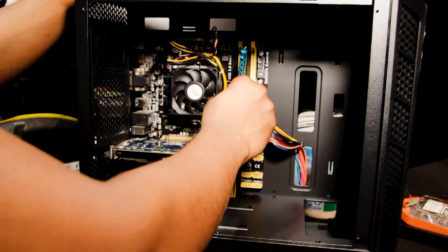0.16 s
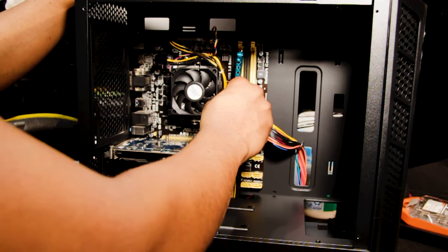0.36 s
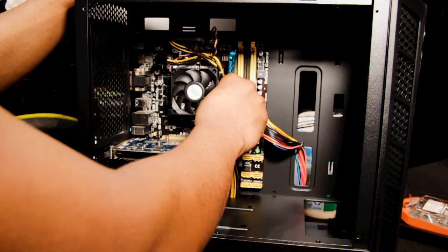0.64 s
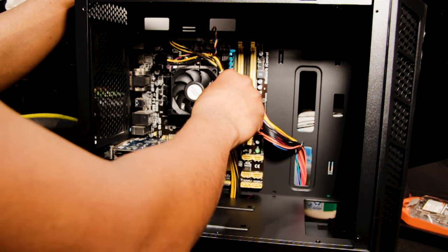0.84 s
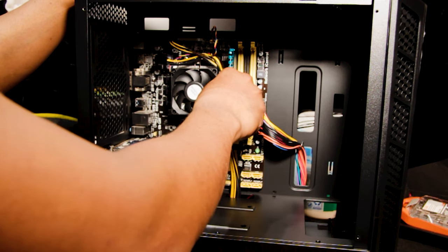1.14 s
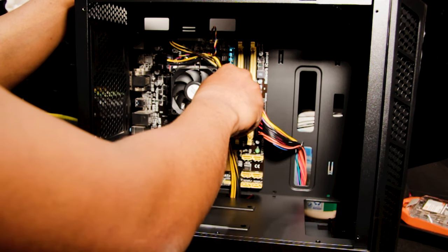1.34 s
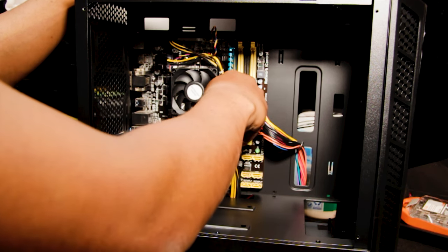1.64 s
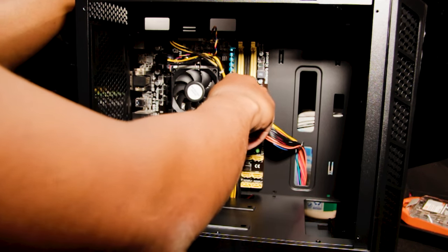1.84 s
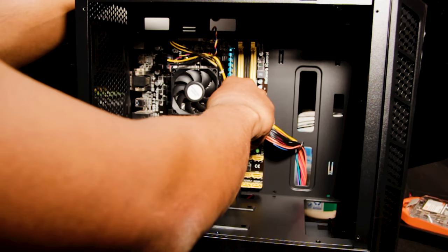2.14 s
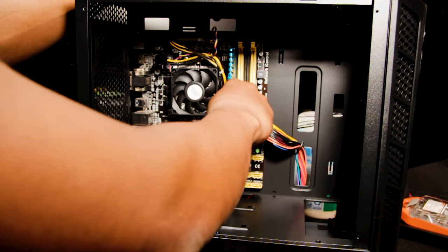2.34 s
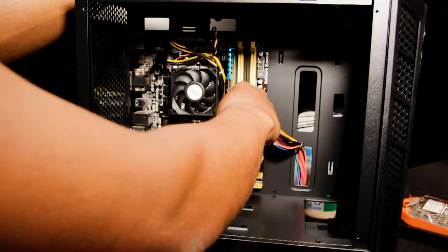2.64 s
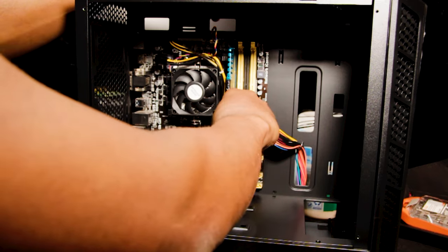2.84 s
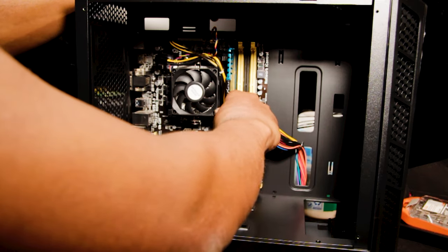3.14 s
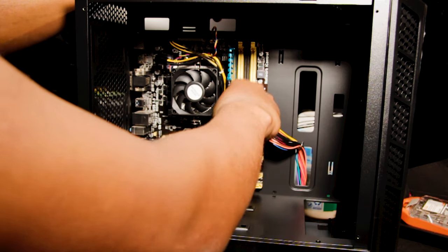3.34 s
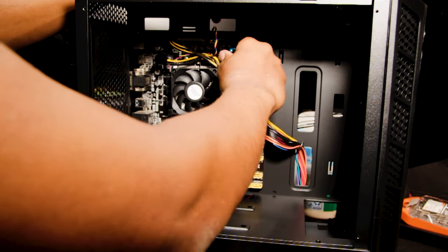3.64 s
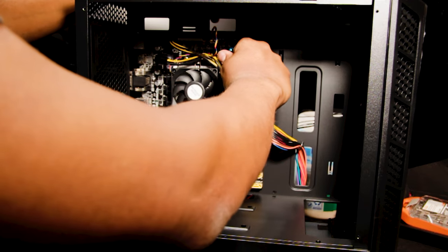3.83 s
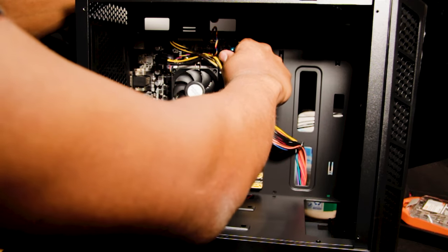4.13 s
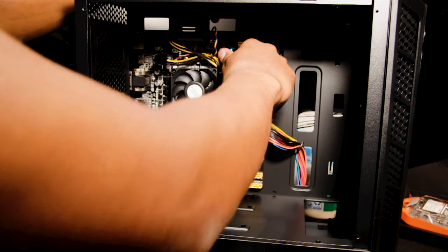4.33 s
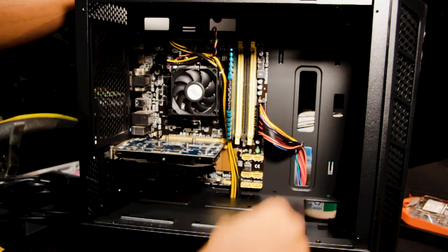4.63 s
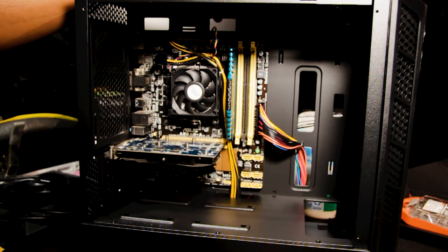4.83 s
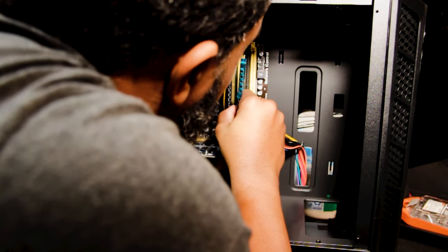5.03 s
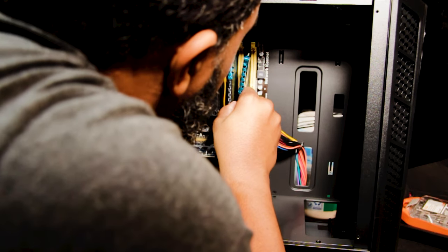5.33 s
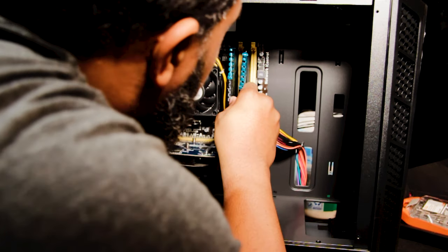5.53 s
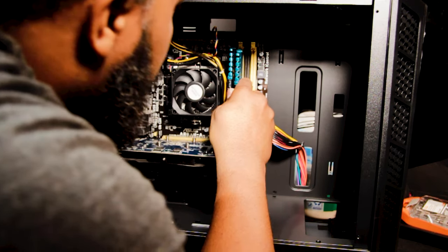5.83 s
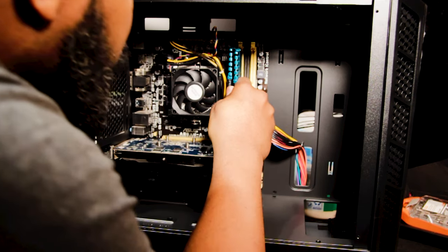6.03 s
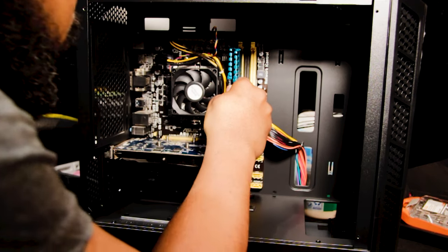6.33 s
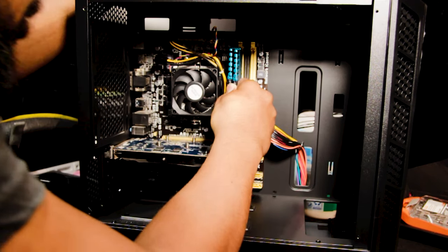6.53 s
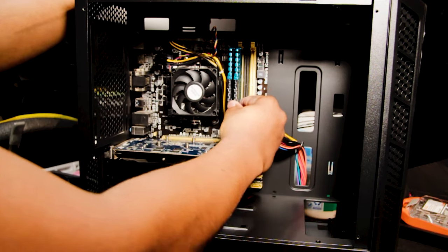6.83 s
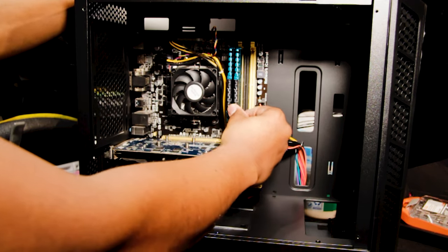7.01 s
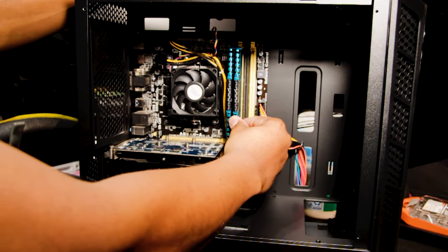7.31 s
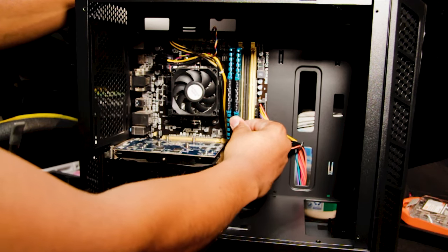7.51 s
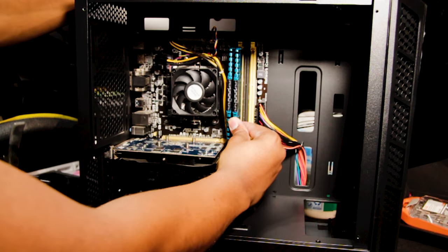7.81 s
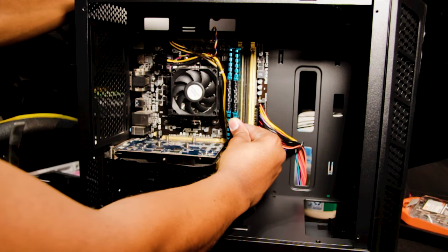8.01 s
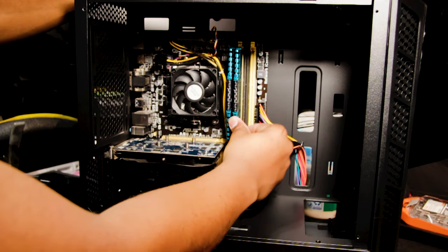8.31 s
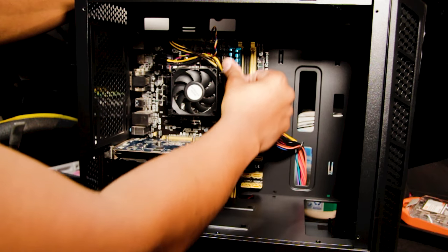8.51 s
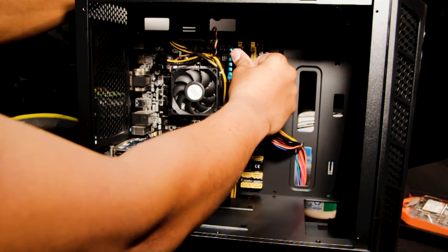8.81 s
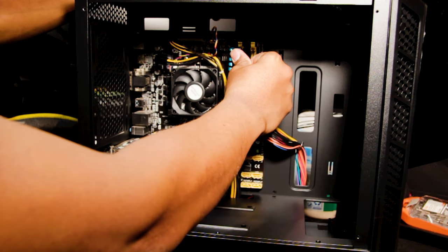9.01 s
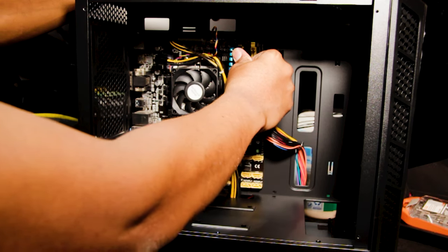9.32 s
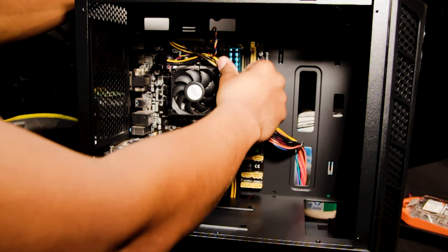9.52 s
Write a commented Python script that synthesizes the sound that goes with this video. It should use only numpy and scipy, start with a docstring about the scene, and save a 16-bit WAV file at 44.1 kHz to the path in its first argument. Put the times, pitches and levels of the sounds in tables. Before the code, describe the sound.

Memory modules are fitted into a motherboard in an open steel computer case, heard close in a quiet room over faint ventilation, hum and hiss. From about 0.4 to 3 seconds, light plastic knocks, ticks and small scrapes sound as the first module is nudged into its slot, with a tiny high squeak near 1.7 seconds. A latch snaps sharply at 3.1 seconds and another at 4.1, each with a brief ring from the board and case. Between 5 and 7.5 seconds come soft, dull finger presses, ticks, faint rubs and slight squeaks, with a bright little spring ping at 5.8. Two more sharp snaps lock the second module at 8.1 and 9.2 seconds. The four snaps are the loudest sounds. A very faint distant whine enters around 8.5 seconds, and a few tiny ticks close things near 9.5.

```python
"""Fitting two memory modules

In an open steel computer case in a quiet room, each module is nudged and scraped into its slot,
then pressed home end by end: the plastic latch snaps and rebounds, the motherboard rings, and case
and room carry the sound on. Knocks, presses, scrapes and rubs are clusters of tiny slips that drive
the same board. Springs ping, the guides squeak; ventilation, hum and microphone hiss lie underneath."""
import sys
import numpy as np
from scipy import signal
from scipy.fft import rfft, irfft
from scipy.io import wavfile
from scipy.ndimage import uniform_filter1d

SR = 44100
rng = np.random.default_rng(int(sys.argv[2]) if len(sys.argv) > 2 else 0)


def master_out(mix):
    """Clip the mix to full scale and print it as 16-bit PCM to the path in sys.argv[1]."""
    frames = np.transpose(np.atleast_2d(mix))
    ceiling = np.clip(frames, -1, 1)
    pcm = np.round(ceiling * 32767).astype(np.int16)
    wavfile.write(sys.argv[1], SR, pcm)


N = 426006
HIT_SIZE = 32768
HEAD_S = .05  # opening part of a hit, over which its level is set
T = np.arange(HIT_SIZE) / SR
F = np.arange(HIT_SIZE // 2 + 1) * SR / HIT_SIZE

# bands of a snap's colour: (edge [Hz])
SNAP_EDGES_HZ = [80, 200, 400, 700, 1100, 1700, 3000, 5500, 7500, 11500, 15500]
# bands of a touch's colour: (edge [Hz])
TOUCH_EDGES_HZ = [80, 200, 350, 600, 1100, 2600, 6000, 15500]


def snaps(slip_db=-11, slip_hz=1500, contact_db=-5, contact_t60_s=0.0092, rebound_db=-3):
    """The module slips into its contacts, the latch hits and rebounds, and the case gives."""
    # latch closures: (time [s], slip before [s], rebound after [s], latch and seat pitch [Hz],
    # level [dB], extra weight on the board [dB], ring passed to the case [dB])
    closures = [(3.1238, .0025, .0021, 920, -35.5, -2, -1.5), (4.081, .0016, .0025, 1300, -39.4, 5, -1),
                (8.079, .001, .002, 800, -37.5, 1, 0), (9.1578, .003, .0014, 3770, -39.5, -4.5, 0)]
    out = np.zeros(N)
    contact = fade(contact_t60_s) * (1 - np.exp(-T / 0.00021))  # plastic yields before it cracks
    slip_lowpass = signal.butter(2, slip_hz, fs=SR, output="sos")
    for s, slip_s, rebound_s, hz, db, weight_db, case_db in closures:
        hit, rebound, slip = rng.standard_normal((3, HIT_SIZE))
        sound = board(s, crack_db=-14, wash_db=case_db - 17.5, modes_db=case_db - 25.5, crack_t60_s=0.06)
        sound += undb(contact_db) * hit * contact
        add(sound, rebound_s, undb(contact_db + rebound_db) * rebound * contact)
        lead = max(int(slip_s * SR), 8)
        slip = undb(slip_db) * signal.sosfilt(slip_lowpass, slip[:lead]) * np.linspace(.2, 1, lead)
        sound = radiate(np.r_[slip, sound], hz, boost_db=7, q=3.3, top_hz=22000, low_hz=190)
        add(out, s - lead / SR, colour(sound, SNAP_EDGES_HZ, db + latch_colour(s, hz, weight_db)))
        add(out, s, thump(-66 + 4 * hand_place(s)))  # more give at the upper end
    return out


def latch_colour(s, hz, weight_db, weight_hz=1300, ring_db=2.0, ring_octaves=0.48):
    """Band dB of the latch under the hand: its seat rings; a heavier push brings out the board's lows."""
    # latch at each end of a slot: (level per snap band [dB])
    lower_db = [-32.5, -13.5, -9, -4, -7, 0, -6.5, -11.5, -5, -9]
    upper_db = [-26.5, -11.5, -9, -10, -5, -4.5, -0.9, -7, -4.5, -9.5]
    place = hand_place(s)
    latch_db = (1 - place) * np.array(lower_db) + place * np.array(upper_db)
    lows = 1 / (1 + (band_centres(SNAP_EDGES_HZ) / weight_hz) ** 2)
    return latch_db + weight_db * lows + ring_db * ring_share(SNAP_EDGES_HZ, hz, ring_octaves)


def knocks(ring_octaves=0.79):
    """The module meets the slot with a clack, gathered round the pitch of the struck part."""
    # knocks on the slot: (time [s], contact [s], pitch [Hz], level [dB], tilt [dB/octave], ring [dB])
    contacts = [(0.383, 0.0014, 900, -63.5, -4.5, -0.5), (.676, .0009, 825, -55.5, -1.2, -2.5),
                (0.824, 0.0076, 820, -64, 0, 11), (0.8337, .0018, 854, -53, 0.2, 11),
                (0.98, 0.0018, 714, -55.5, -3, 3.5), (1.19, 0.0059, 2040, -57.5, 0.5, 4.5),
                (1.233, 0.021, 3340, -56.5, 1.3, -0.5), (1.713, 0.0057, 420, -64.5, -1.5, 3.5),
                (2.469, 0.0022, 450, -65, -3, 2), (2.7081, 0.0059, 1110, -61, 1.5, 6.5),
                (2.973, 0.029, 750, -69.5, 1, 0), (3.873, 0.018, 1950, -58, 1.3, 2),
                (6.001, 0.001, 714, -57.5, -2.5, 3.5)]
    # knock colour: (level per touch band [dB])
    knock_db = [-20.5, -10, -7, -1, -5, -7.7, -21]
    out = np.zeros(N)
    for s, length_s, hz, db, tilt_db, ring_db in contacts:
        band_db = np.array(knock_db) + ring_db * ring_share(TOUCH_EDGES_HZ, hz, ring_octaves)
        clack = touch(s, length_s, hz, db, tilt_db, band_db, case_db=-1, boost_db=3, q=9.4, sustain=0.83)
        add(out, s, clack)
    return out


def presses(flex_hz=292, give_db=-13):
    """A fingertip loads the module: the board thuds on its posts, contacts rasp, the case gives."""
    # finger presses: (time [s], contact [s], level [dB], tilt [dB/octave])
    contacts = [(3.9885, 0.0043, -58, -1), (4.347, 0.046, -72, -.7), (5.073, .028, -55, -.5),
                (5.494, 0.033, -58.5, -1.3), (5.636, 0.018, -69.5, -1), (6.32, 0.017, -59, 2),
                (6.833, .008, -66.5, 0), (6.887, 0.038, -68, -0.5), (7.37, 0.0024, -58.5, -0.5),
                (9.0974, 0.01, -56.5, 1.7)]
    # press colour: (level per touch band [dB])
    press_db = [-11.5, 0, -6, -7.5, -9.5, -7.5, -16.5]
    out = np.zeros(N)
    for s, length_s, db, tilt_db in contacts:
        add(out, s, touch(s, length_s, flex_hz, db, tilt_db, press_db,
                          case_db=-2.5, boost_db=0, q=4.0, sustain=0.62))
        add(out, s, thump(db + give_db))
    return out


def scrapes():
    """The module's edge drags over the small, stiff contact springs."""
    # ticks and scrapes: (time [s], contact [s], pitch [Hz], level [dB], tilt [dB/octave])
    contacts = [(0.612, 0.0034, 3580, -70.5, 1), (.639, 0.0011, 3350, -70, 0.5),
                (1.527, 0.0027, 2800, -73.5, -1.5), (2.121, .016, 4500, -74, -1),
                (2.28, 0.00079, 4120, -66.5, 1.5), (3.204, 0.0067, 3670, -71.5, 1),
                (3.416, 0.022, 5000, -75.5, 0.5), (3.58, .002, 3100, -68, 1.1),
                (5.772, .0008, 2340, -60.5, 3), (6.083, .025, 3020, -75, -1.5),
                (6.149, 0.0018, 3920, -73, 0.5), (8.438, 0.009, 4700, -75.5, -1.5),
                (9.431, 0.00082, 2720, -70.5, 1.2), (9.512, 0.007, 2760, -73, -0.5),
                (9.553, 0.014, 2780, -77, -2)]
    # scrape colour: (level per touch band [dB])
    scrape_db = [-15, -7, -4.5, -5.5, -2.5, 0, -8]
    out = np.zeros(N)
    for s, length_s, hz, db, tilt_db in contacts:
        add(out, s, touch(s, length_s, hz, db, tilt_db, scrape_db,
                          case_db=1, boost_db=7, q=5.0, sustain=0.96))
    return out


def rubs(module_hz=2900):
    """Skin drags over the module's thin board in a long run of tiny slips."""
    # fingertip slides: (time [s], length [s], level [dB])
    slides = [(2.609, 0.11, -71), (3.5, 0.25, -78), (6.663, 0.088, -75.5), (7.194, 0.11, -70)]
    # rub colour: (level per touch band [dB])
    rub_db = [-15, 1.5, 2.5, 1, -5.5, -2.5, -6]
    out = np.zeros(N)
    for s, length_s, db in slides:
        add(out, s, touch(s, length_s, module_hz, db, tilt_db=0, band_db=rub_db,
                          case_db=-8, boost_db=8, q=8.0, sustain=0.83))
    return out


def pings():
    """A flicked free latch or contact spring rings in one decaying mode."""
    # flicks: (time [s], pitch [Hz], t60 [s], peak [dB])
    flicks = [(1.529, 2900, 0.037, -55), (5.772, 2320, 0.034, -42.5), (5.7725, 4820, 0.071, -56),
              (9.4315, 2850, 0.044, -59)]
    out = np.zeros(N)
    for s, hz, t60_s, db in flicks:
        add(out, s, undb(db) * fade(t60_s) * np.sin(2 * np.pi * hz * T))
    return out


def squeaks(pitch_hz=10250, jitter=0.05):
    """The module's edge sticks and slips in its plastic guide: brief chirps of unsteady pitch."""
    # chirps: (time [s], length [s], rms at the crest [dB])
    chirps = [(1.702, .03, -61.5), (6.882, .028, -68.5), (7.249, 0.035, -65.5), (9.508, .022, -65.5)]
    out = np.zeros(N)
    for s, length_s, db in chirps:
        size = int(length_s * SR)
        chirp = tone(pitch_hz * (1 + jitter * wander(2000, size)))
        add(out, s, undb(db) * np.hanning(size) * chirp)
    return out


def touch(s, length_s, hz, db, tilt_db, band_db, case_db, boost_db, q, sustain):
    """A cluster of tiny slips drives the board: short ones tick or knock, long ones rub."""
    scatter_db, brisk_s = 3.0, 0.0036
    size = max(int(length_s * SR), 8)
    chance, push, weight = rng.standard_normal((3, HIT_SIZE))[:, :size]
    force = (chance > 1.3) * push * undb(scatter_db * weight) * np.hanning(size)
    # a brisk touch lands with its full weight at once
    force[0] += 3 * (np.linalg.norm(force) + 0.092) * np.exp(-length_s / brisk_s)
    response = board(s, crack_db=case_db - 19.5, wash_db=case_db - 23.5, modes_db=case_db - 36.5,
                     crack_t60_s=0.033, sustain=sustain)
    sound = radiate(signal.fftconvolve(force, response), hz, boost_db, q, top_hz=10900)
    octaves = np.log2(band_centres(TOUCH_EDGES_HZ) / hz)
    return colour(sound, TOUCH_EDGES_HZ, db + np.array(band_db) + tilt_db * octaves, max(HEAD_S, length_s))


def board(s, crack_db, wash_db, modes_db, crack_t60_s, sustain=1):
    """One tap: pulse, plastic crack, wash and modes. The hand damps ring times to the share sustain."""
    ring = board_modes(hand_place(s), sustain)
    wash = case_wash(sustain)
    crack = rng.standard_normal(HIT_SIZE) * fade(crack_t60_s)
    return (T == 0) + undb(crack_db) * crack + undb(wash_db) * wash + undb(modes_db) * ring


def board_modes(place, sustain, detune=0.0016):
    """Board and case ring in damped modes whose strengths depend on the place struck."""
    # modes: (pitch [Hz], free t60 [s], level struck at lower end [dB], at upper end [dB])
    modes = [(262.2, 0.25, -2.5, -5), (299.6, 0.42, -7, -16), (348, 0.26, -15, -9.5),
             (403, 0.14, -17, -5.5), (564, 0.43, -12, -15), (639, 0.66, -15, -18.5), (742, 0.1, -10, -17),
             (800, 0.05, 2.5, -22), (925, 0.097, -1, -0.5), (1176, 0.15, -13, -6.5), (1378, 0.15, -23, -10),
             (1401, 0.08, -30, -5), (1510, 0.069, 1.5, -27), (1952, 0.046, 7.5, -18),
             (2235, 0.072, -5.5, -19), (2340, 0.11, -15, -8), (2756, 0.11, -3, -3), (2860, 0.06, -1, -6),
             (3650, 0.017, -11, 11.5), (4460, 0.07, -15, 2), (5280, 0.037, 8, 7.5), (8260, .03, -2, -7),
             (10700, 0.018, 14, 10)]
    ring = np.zeros(HIT_SIZE)
    for hz, t60_s, lower_db, upper_db in modes:
        offset, polarity = rng.standard_normal(2)
        t = T[T < 1.2 * t60_s]
        gain = np.sign(polarity) * undb(lower_db + place * (upper_db - lower_db))
        decay = fade(sustain * t60_s)[:len(t)]
        ring[:len(t)] += gain * decay * np.sin(2 * np.pi * hz * (1 + detune * offset) * t)
    return ring


def case_wash(sustain, bloom_s=0.0022):
    """Countless weak modes merge into noise that builds up in the case and dies away in the room."""
    # wash bands: (centre [Hz], free case t60 [s], free room t60 [s], room level [dB])
    bands = [(150, 0.37, 0.69, -20), (400, 0.3, 0.49, -4.5), (1000, 0.19, 0.68, -21.5),
             (2720, 0.16, 0.32, -32), (7000, 0.14, 0.33, -28), (14200, 0.042, 0.27, -34)]
    centres_hz = np.transpose(bands)[0]
    spectrum = rfft(rng.standard_normal(HIT_SIZE))
    wash = np.zeros(HIT_SIZE)
    for (_, case_t60_s, room_t60_s, room_db), share in zip(bands, np.eye(len(bands))):
        decay = np.hypot(fade(sustain * case_t60_s), sustain * undb(room_db) * fade(sustain * room_t60_s))
        wash += irfft(spectrum * log_interp(F, centres_hz, share)) * decay
    return wash * (1 - np.exp(-T / bloom_s))


def radiate(x, hz, boost_db, q, top_hz, low_hz=110):
    """The touched part adds its own resonance; so small a plate radiates little deep bass."""
    part = 1 + undb(boost_db) * resonance(F, hz, hz / q)
    softness = 1 / (1 + 1j * F / top_hz) ** 2
    sound = irfft(rfft(x[:HIT_SIZE]) * part * softness)
    return signal.sosfilt(signal.butter(2, low_hz, "high", fs=SR, output="sos"), sound)


def thump(db, band_hz=(45, 110), t60_s=0.47, rise_s=0.0052):
    """The whole case gives under the thumb with a low rumble."""
    bandpass = signal.butter(2, band_hz, "band", fs=SR, output="sos")
    rumble = signal.sosfilt(bandpass, rng.standard_normal(HIT_SIZE))
    return undb(db) * rumble / rumble.std() * fade(t60_s) * (1 - np.exp(-T / rise_s))


def hand_place(s):
    """Position of the hand along the slot."""
    # hand path: (time [s], place [0 = lower end, 1 = upper end])
    path = [(0, .1), (3.2, 0), (3.5, 1), (4.4, 1), (5, .7), (6.5, .6), (7.2, 0), (8.2, 0), (8.7, 1)]
    return np.interp(s, *np.transpose(path))


def room_tone():
    """Steady ventilation and hiss, wavering fan and mains hum, and a faint far whine."""
    # ventilation: (frequency [Hz], density [dB/Hz])
    ventilation = [(25, -108), (55, -102.5), (90, -94), (135, -93), (165, -100), (240, -102.5),
                   (500, -101.5), (800, -100), (1200, -100), (1550, -107), (2100, -115), (3000, -117),
                   (4000, -124), (15000, -136)]
    # bumps in the hiss: (centre [Hz], nominal width [Hz], density [dB/Hz])
    hiss_bumps = [(2850, 1700, -114), (5000, 320, -116.5), (6970, 160, -119), (9100, 1600, -124)]
    # fan and mains lines: (pitch [Hz], rms [dB])
    hum_lines = [(91.5, -89), (119.5, -90), (188, -81)]
    # far whine: (time [s], pitch [Hz], rms [dB])
    whine_path = [(8.35, 1280, -100), (8.55, 1288, -78), (8.72, 1295, -80), (8.87, 1280, -95),
                  (9.0, 1263, -77.5), (9.35, 1256, -77), (9.66, 1242, -82)]
    air = noise(*np.transpose(ventilation))
    f = F[1:]
    bumps = sum(undb(db) * np.abs(resonance(f, hz, 1.77 * width)) ** 2 for hz, width, db in hiss_bumps)
    hiss = noise(f, 20 * np.log10(bumps))
    hum = sum(undb(db + 2 * wander(9, N)) * tone(hz + 4 * wander(20, N)) for hz, db in hum_lines)
    s, hz, db = np.transpose(whine_path)
    t = np.arange(N) / SR
    whine = np.interp(t, s, undb(db), left=0) * tone(np.interp(t, s, hz))
    return air + hiss + hum + whine


def microphone_hiss():
    """Nearly white noise, independent in each channel."""
    return np.array([noise(hz=[40, 300, 2000, 15000], db=[-111, -111.5, -113, -113]) for _ in range(2)])


def colour(x, edges_hz, band_db, head_s=HEAD_S):
    """Two minimum-phase passes bring the head of a hit towards its rms level in each band."""
    for _ in range(2):
        power = 2 * np.abs(rfft(x * (T < head_s))) ** 2 / (HIT_SIZE * head_s * SR)
        rms = np.sqrt([power[(F >= lo) & (F < hi)].sum() for lo, hi in zip(edges_hz, edges_hz[1:])])
        cepstrum = irfft(log_interp(F, band_centres(edges_hz), np.log(undb(band_db) / rms)))
        causal = cepstrum * (1 + np.sign(T)) * (T < T[-1] / 2)
        x = irfft(rfft(x) * np.exp(rfft(causal)))
    return x


def resonance(f, hz, width_hz):
    """Response of one damped mode, gain 1 at its centre."""
    return 1j * f * width_hz / (hz ** 2 - f ** 2 + 1j * f * width_hz)


def ring_share(edges_hz, hz, octaves):
    """Bell-shaped weight of a part's ring in each band."""
    return np.exp(-.5 * (np.log2(band_centres(edges_hz) / hz) / octaves) ** 2)


def band_centres(edges_hz):
    """Geometric middle of each band."""
    edges_hz = np.array(edges_hz, float)
    return np.sqrt(edges_hz[1:] * edges_hz[:-1])


def noise(hz, db):
    """Steady noise with a given density in dB/Hz."""
    f = np.arange(N // 2 + 1) * SR / N
    return irfft(rfft(rng.standard_normal(N)) * undb(log_interp(f, hz, db)) * np.sqrt(SR / 2), N)


def tone(hz):
    """Unit-rms sine along a pitch curve."""
    return np.sqrt(2) * np.sin(2 * np.pi * np.cumsum(hz) / SR)


def wander(rate_hz, size):
    """Smooth random drift with a spread near 1."""
    step = max(int(SR / rate_hz), 1)
    return uniform_filter1d(np.repeat(rng.standard_normal(size // step + 1), step), step)[:size]


def fade(t60_s):
    """Exponential decay over the length of a hit."""
    return np.exp(-np.log(1000) * T / t60_s)


def log_interp(f, hz, values):
    """Interpolate on a log-frequency axis."""
    return np.interp(np.log(np.maximum(f, 1)), np.log(hz), values)


def undb(db):
    """Decibels to gain."""
    return 10 ** (np.asarray(db) / 20)


def add(out, s, x):
    """Mix x into out from time s on."""
    start = int(s * SR)
    out[start:start + len(x)] += x[:len(out) - start]


def scene():
    """One microphone feeds both channels; each adds its own hiss."""
    hiss = microphone_hiss()
    return snaps() + knocks() + presses() + scrapes() + rubs() + pings() + squeaks() + room_tone() + hiss


def record(dry):
    """Steep low-pass at 15.8 kHz."""
    return signal.sosfilt(signal.ellip(10, .1, 70, 15800, fs=SR, output="sos"), dry)


dry = scene()
out = record(dry)
master_out(out)
```